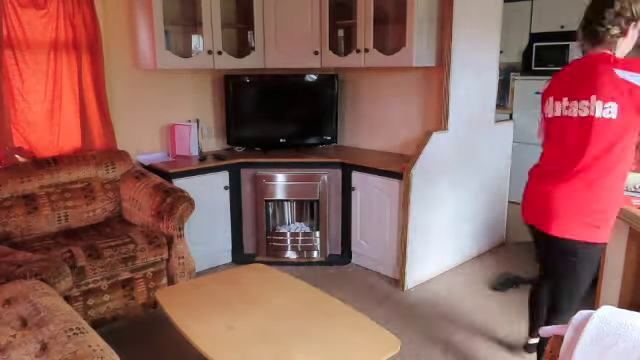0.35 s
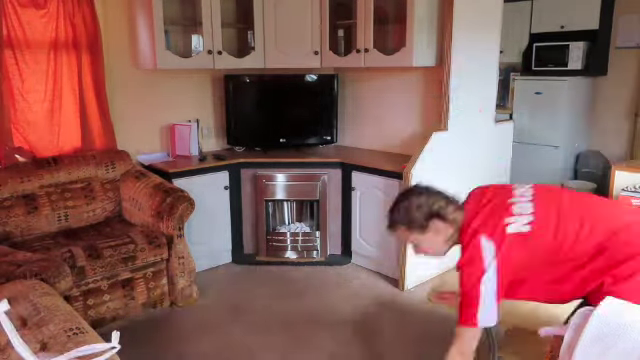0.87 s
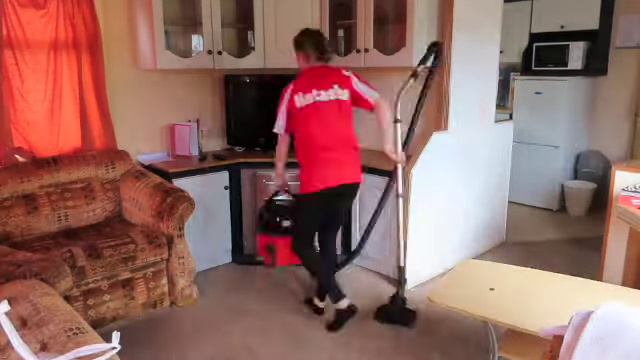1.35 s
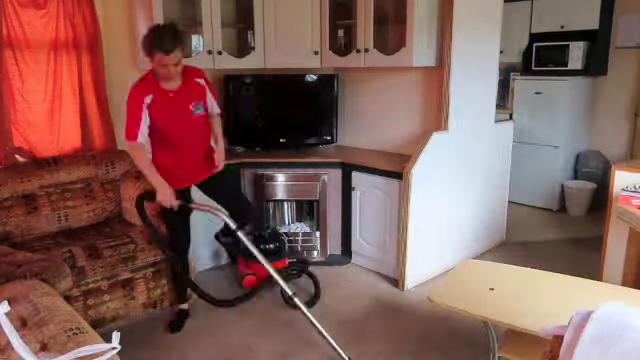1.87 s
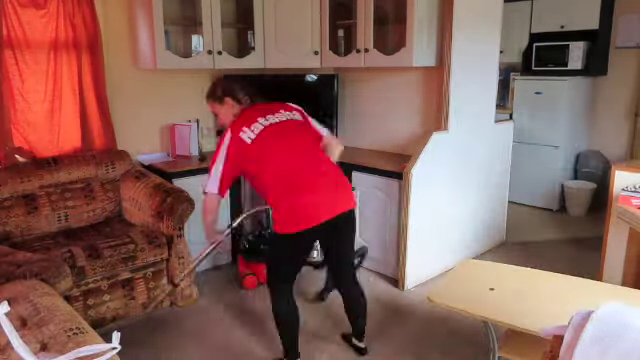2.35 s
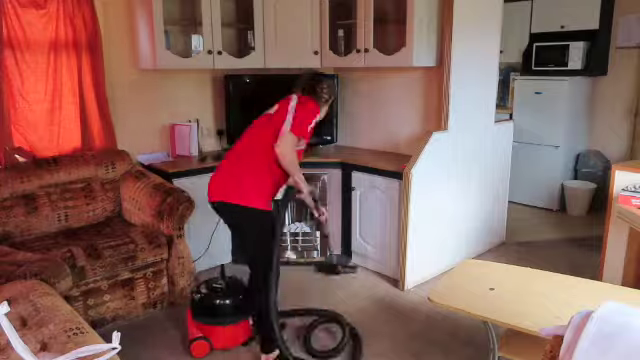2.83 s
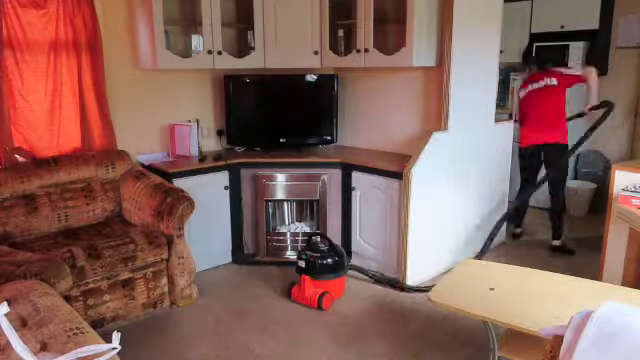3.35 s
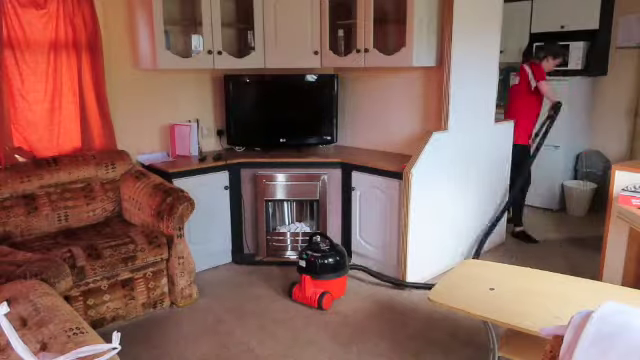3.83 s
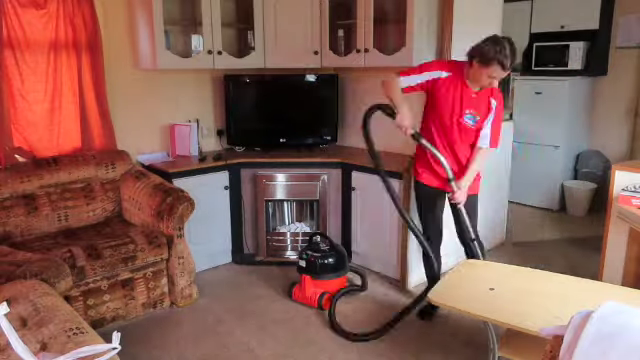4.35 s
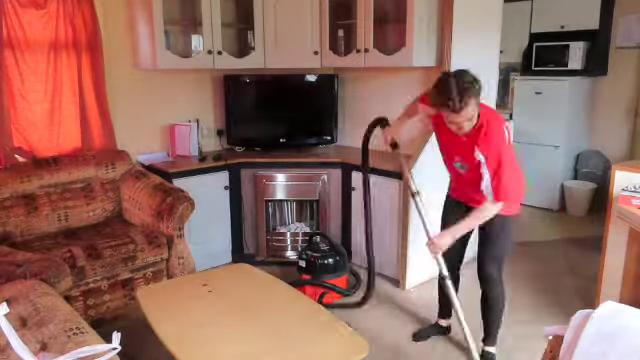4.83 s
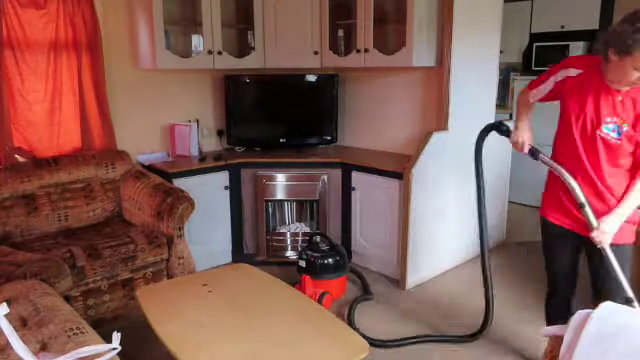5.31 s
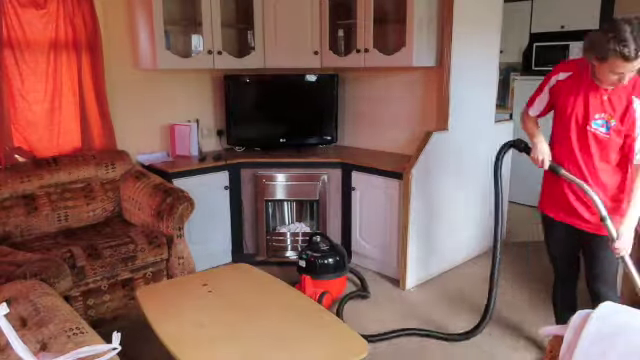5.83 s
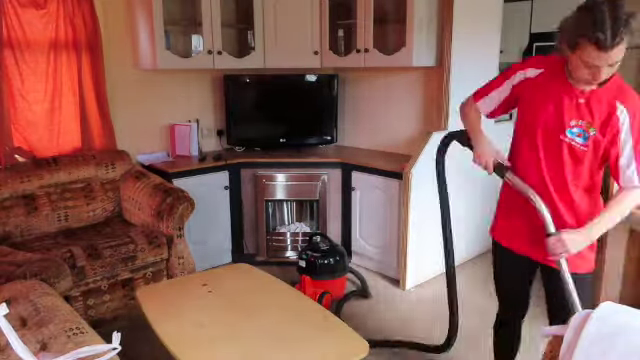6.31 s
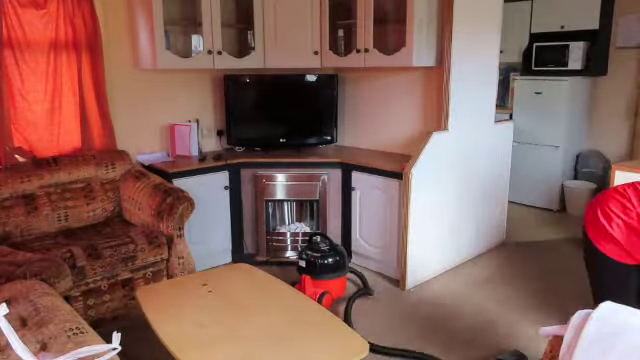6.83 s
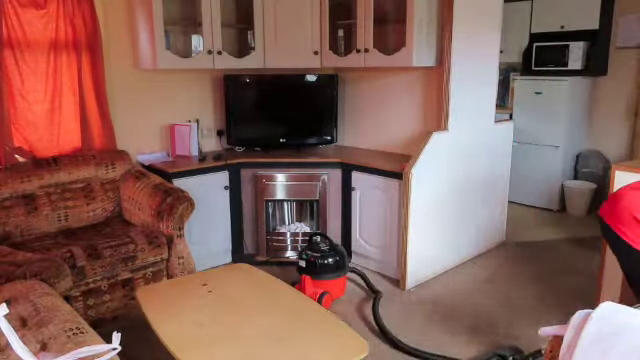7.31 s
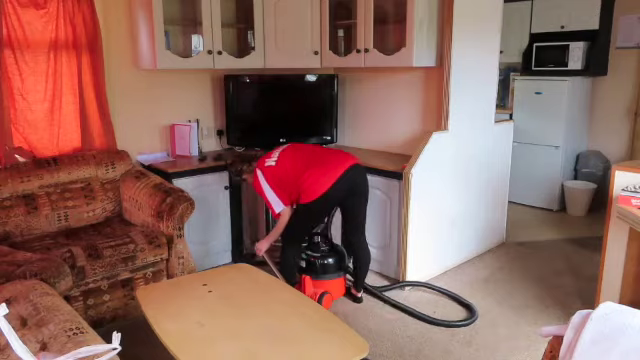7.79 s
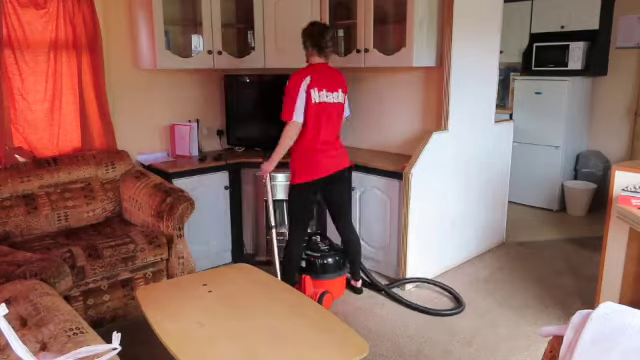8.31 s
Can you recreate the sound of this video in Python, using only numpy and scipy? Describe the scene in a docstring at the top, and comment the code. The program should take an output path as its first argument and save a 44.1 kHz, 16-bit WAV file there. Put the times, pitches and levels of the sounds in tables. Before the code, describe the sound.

Frantic taps and faint rustling give way to a fast-forwarded vacuum cleaner, airy hiss and piercing whine peppered with bumps and brush scrubs.

```python
"""A cylinder vacuum cleaner in a small carpeted room, sounding as if played about twenty times too fast. Its
mains hum is a thin sine, its shaft a high gliding whine; a flat hiss of shaped noise runs with it, its nozzle a
rumble of rough noise ringing the room. Before it is switched on there is faint shuffling; throughout, steps,
bumps and brush strokes are short knocks and scrubs: noise bursts that excite decaying room modes, with puffs of
hiss, small chance taps and a few floor thuds."""
import sys
import numpy as np
from scipy import signal
from scipy.fft import rfft, irfft, next_fast_len
from scipy.io import wavfile
from scipy.ndimage import uniform_filter1d

SR = 44100
rng = np.random.default_rng(int(sys.argv[2]) if len(sys.argv) > 2 else 0)


def decibels_to_gain(level_db):
    """Convert a level in decibels to a linear amplitude gain (20 dB per decade)."""
    exponent = np.asarray(level_db, float) / 20
    return 10 ** exponent


def materialize(psi):
    """Save the field psi as 16-bit PCM at rate SR to the path in sys.argv[1].

    A 1-D psi becomes a single channel; in a 2-D psi each row is a channel.
    """
    bounded = np.clip(np.atleast_2d(psi).T, -1, 1)
    quanta = np.round(bounded * 32767).astype(np.int16)
    wavfile.write(sys.argv[1], SR, quanta)


N = 382347

# resonances of room and furniture, excited by blows, strokes and nozzle: frequency_hz, level_db, t60_s
ROOM_MODES = [(1000, -17, 0.035), (1293, -3, 0.053), (1412, 9.5, 0.021), (1580, -2, 0.039),
              (1800, 5, 0.019), (2064, 8.5, 0.014), (2400, 8, 0.016), (2800, 3.5, 0.013),
              (3246, 7.5, 0.015), (3746, 7, 0.0094), (4170, 15, 0.0067), (5230, 12, 0.023)]
# spectrum of the hiss in knocks and taps: frequency_hz, level_db (per hertz)
PUFF_SPECTRUM = [(20, -16), (300, -6.5), (1000, 1.5), (9000, 0.5), (16000, -4.5)]


def evened(x):
    """Normalisation of mean power: scales to rms 1."""
    return x / np.sqrt(np.mean(x ** 2) + 1e-20)


def coloured(x, points):
    """Linear filtering: multiplies the spectrum by a curve through (Hz, dB) points."""
    f, db = np.transpose(points)
    size = next_fast_len(len(x))
    hz = np.fft.rfftfreq(size, 1 / SR)
    gain = decibels_to_gain(np.interp(np.log(hz + 1), np.log(f + 1), db))
    return irfft(rfft(x, size) * gain, size)[:len(x)]


def curve(rows):
    """Linear interpolation in time: sample positions, and every further column sample by sample."""
    s, *columns = np.transpose(rows)
    at = np.arange(round(s[0] * SR), min(round(s[-1] * SR), N))
    return at, [np.interp(at / SR, s, c) for c in columns]


def wander(count, ms):
    """Low-pass random process: noise smoothed twice over ms, with rms 1."""
    size = max(int(ms * SR / 1000), 1)
    smooth = uniform_filter1d(uniform_filter1d(rng.standard_normal(count), size), size)
    return evened(smooth)


def room_tone():
    """Broadband noise of fluctuating level: faint shuffling in the quiet room."""
    levels = [(0.0, -42), (0.072, -53), (1.088, -50), (1.318, -45), (1.572, -51.5), (1.76, -52.5)]  # time_s, level_db
    spectrum = [(18, -43), (30, -9), (70, -12), (200, -30), (372, 1), (1060, 0.5), (1340, -2), (3540, -7),
                (7780, -13), (15800, -14.5)]  # frequency_hz, level_db (per hertz)
    at, (db,) = curve(levels)
    noise = evened(coloured(rng.standard_normal(len(at)), spectrum))
    out = np.zeros(N)
    out[at] = decibels_to_gain(db + 3.5 * wander(len(at), ms=15)) * noise
    return out


def fidget():
    """Poisson process of small chance taps of hose, cable and clothes: decaying puffs of hiss."""
    start_s, fall_ms = 1.76, 2.5  # the motor starts; a tap falls by 10 dB
    quiet = np.arange(N) < start_s * SR
    taps_per_s = np.where(quiet, 40, 30)
    faintest_db = np.where(quiet, -54, -36)
    spread_db = np.where(quiet, 4, 3.5)
    tap_db = faintest_db + spread_db * np.minimum(rng.exponential(1, N), 3)
    taps = (rng.random(N) < taps_per_s / SR) * decibels_to_gain(tap_db)
    t_ms = np.arange(800) * 1000 / SR
    envelope = signal.oaconvolve(taps, decibels_to_gain(-10 * t_ms / fall_ms))[:N]
    return envelope * evened(coloured(rng.standard_normal(N), PUFF_SPECTRUM))


def ringing(modes, uneven_db=0, detune=0):
    """Modal superposition: decaying sines of total energy 1, levels and pitches varied by chance."""
    t = np.arange(2000) / SR
    hz, db, t60 = np.transpose(modes)[:, :, None]
    db = db + uneven_db * rng.standard_normal(db.shape)
    hz = hz * (1 + detune * rng.standard_normal(db.shape))
    decay = np.exp(-np.log(1000) * t / t60)
    ring = (decibels_to_gain(db) * decay * np.sin(2 * np.pi * hz * t)).sum(0)
    return ring / np.linalg.norm(ring)


def knocks(rows, size, width, skirt_db, ring_db, rounding, cut, grain_db):
    """Source and resonator: noise bursts around a body pitch excite the room modes; hiss puffs join.

    Rows: time_s, body_db, rise_ms, fall_ms, body_hz, hiss_db; rise and fall span 10 dB.
    """
    hiss_lead = .3  # share of the time-reversed envelope, so the hiss swells in early
    half = size // 2
    ms = (np.arange(size) - half) * 1000 / SR
    hz = np.fft.rfftfreq(size, 1 / SR)
    noise = rng.standard_normal((len(rows), 2, size))
    out = np.zeros(N + size)
    for (s, body_db, rise_ms, fall_ms, body_hz, hiss_db), (shake, puff) in zip(rows, noise):
        distance = abs(ms) / np.where(ms < 0, rise_ms, fall_ms)
        shape = decibels_to_gain(-10 * distance ** rounding + grain_db * wander(size, ms=1.5))
        puff_shape = np.maximum(shape, hiss_lead * shape[::-1])

        octaves = np.log2((hz + 1) / body_hz)
        peak_octaves = width * max(body_hz, 1500) / 2000
        skirt = decibels_to_gain(skirt_db - 6.1 * abs(octaves))
        peak = np.exp(-.5 * (octaves / peak_octaves) ** 2) + skirt
        low_cut = 1 / (1 + (cut * min(body_hz, 1900) / (hz + 1)) ** 8)
        # each knock favours and shifts some modes by chance
        room = 1 + decibels_to_gain(ring_db) * rfft(ringing(ROOM_MODES, uneven_db=4.5, detune=.04), size)

        burst = irfft(rfft(shake) * peak) * shape
        body = evened(irfft(rfft(burst) * low_cut * room))
        hiss = evened(coloured(puff, PUFF_SPECTRUM) * puff_shape)
        energy = np.sqrt(np.mean(shape ** 2))  # restores the envelope's rms after evening
        start = round(s * SR)
        out[start:start + size] += energy * (decibels_to_gain(body_db) * body + decibels_to_gain(hiss_db) * hiss)
    return out[half:half + N]


def blows():
    """Impulsive excitation: steps, bumps and taps with a sharp rise and a short fall."""
    # time_s, body_db, fall_ms (to -10 dB), body_hz, hiss_db
    events = [(0.014, -45, 4, 2500, -28), (0.0311, -24.0, 2.0, 1220.0, -58.0),
              (0.049, -34.0, 1.5, 2430.0, -45.0), (0.0596, -17.0, 3.2, 1150.0, -57.0),
              (0.094, -27.0, 2.4, 1710.0, -43.0), (0.1653, -25.0, 2.4, 1280.0, -58.0),
              (0.2042, -31.0, 2.4, 910.0, -53.0), (0.232, -15, 3, 4300, -16),
              (0.2905, -29.0, 2.0, 1080.0, -54.0), (0.348, -43.0, 2, 2090.0, -32.0),
              (0.382, -48.0, 2, 1960.0, -33.0), (0.4502, -24.0, 3.2, 1890.0, -23.0),
              (0.6008, -34.0, 3.2, 1710.0, -46.0), (0.6283, -34.0, 4.8, 900.0, -41.0),
              (0.6482, -31.0, 5.2, 1770.0, -43.0), (0.6821, -19.0, 4.0, 2160.0, -19.0),
              (0.7314, -30.0, 1.6, 1480.0, -58.0), (0.7739, -31.0, 1.6, 2230.0, -29.0),
              (0.787, -37.0, 2, 1900.0, -34.0), (0.8672, -35.0, 8.8, 2230.0, -48.0),
              (0.8955, -9, 2.4, 1750, -55), (1.0139, -40.0, 1.6, 2550.0, -27.0),
              (1.0289, -44.0, 2.0, 1940.0, -26.0), (1.0618, -22.0, 1.6, 990.0, -46.0),
              (1.0837, -13.0, 1.6, 1180.0, -58.0), (1.1067, -27.0, 1.6, 1210.0, -58.0),
              (1.168, -20.0, 2.0, 2430.0, -17.0), (1.188, -25.0, 2.0, 2510.0, -24.0),
              (1.2025, -23.0, 1.6, 2530.0, -36.0), (1.2355, -30, 2, 1500, -27),
              (1.2424, -24.0, 7.2, 1730.0, -22.0), (1.2848, -28.0, 1.6, 1970.0, -21.0),
              (1.301, -42, 1.5, 2500, -33), (1.3147, -35.0, 6.0, 2740.0, -29.0),
              (1.33, -42, 1.5, 2500, -34), (1.343, -44, 2, 2500, -33), (1.3586, -12.0, 2.0, 1300.0, -41.0),
              (1.37, -40, 1.5, 3000, -28), (1.4204, -36.0, 0.8, 3240.0, -21.0),
              (1.426, -18.0, 6.4, 2050.0, -16.0), (1.4715, -16.0, 2.4, 2370.0, -17.0),
              (1.4778, -13.0, 1.2, 2350.0, -13.0), (1.5058, -9.0, 1.2, 2920.0, -14.0),
              (1.5931, -38.0, 1.2, 1870.0, -27.0), (1.614, -27.0, 1.6, 2360.0, -20.0),
              (1.634, -13.0, 1.2, 2270.0, -19.0), (1.6669, -33.0, 2.8, 1730.0, -58.0),
              (1.7537, -26.0, 1.2, 2500.0, -36.0), (1.7745, -22.0, 1.5, 3740.0, -34.0),
              (1.836, -12.0, 3.2, 1640.0, -13.0), (2.208, -13.0, 4.5, 1790.0, -14.0),
              (2.2482, -18.0, 1.2, 1550.0, -53.0), (2.2775, -25.0, 2.4, 2100.0, -17.0),
              (2.3045, -17.0, 6.0, 2890.0, -28.0), (2.4451, -22.0, 9.6, 2490.0, -32.0),
              (2.4552, -17.0, 0.8, 1740.0, -41.0), (2.5255, -19.0, 1.2, 1870.0, -15.0),
              (2.5514, -18.0, 0.8, 3080.0, -19.0), (2.5863, -9.0, 1.6, 2430.0, -23.0),
              (2.6048, -14.0, 2.0, 2120.0, -15.0), (2.6567, -16.0, 1.6, 2380.0, -15.0),
              (2.7105, -13.0, 3.2, 2570.0, -10.0), (2.8013, -23.0, 4.4, 1700.0, -15.0),
              (2.8125, -21.0, 2, 1970, -18.0), (2.8802, -18.0, 3.2, 2790.0, -20.0),
              (2.9824, -15.0, 2.4, 2250.0, -16.0), (3.0338, -9.0, 2.0, 1910.0, -12.0),
              (3.0496, -15.0, 3.2, 1720.0, -52.0), (3.2403, -21.0, 9.6, 1930.0, -17.0),
              (3.2728, -17.0, 2.4, 1830.0, -16.0), (3.4962, -17.0, 2.4, 2060.0, -27.0),
              (3.7307, -16.0, 2.4, 2460.0, -17.0), (3.7497, -23.0, 2.4, 2740.0, -26.0),
              (3.8305, -14.0, 2.0, 2880.0, -17.0), (3.9442, -30.0, 6, 1940.0, -30.0),
              (4.0136, -12.0, 2.8, 2100.0, -16.0), (4.0849, -13.0, 4.0, 2370.0, -20.0),
              (4.1812, -23.0, 1.2, 2640.0, -16.0), (4.4127, -17.0, 5, 1970.0, -30.0),
              (4.7418, -16.0, 1.2, 1260.0, -27.0), (4.8512, -16.0, 2.8, 2210.0, -23.0),
              (5.0672, -17.0, 4.8, 1760.0, -21.0), (5.0831, -13.0, 1.2, 1670.0, -25.0),
              (5.161, -9, 3, 1650, -14), (5.1774, -9.0, 4.8, 1600.0, -23.0),
              (5.2163, -12.0, 2.8, 2040.0, -23.0), (5.2313, -16.0, 3.6, 1510.0, -24.0),
              (5.2642, -15.0, 2.4, 2380.0, -15.0), (5.3007, -10.0, 1.2, 1570.0, -24.0),
              (5.3146, -11.0, 6.0, 1830.0, -18.0), (5.372, -10.0, 1.2, 1520.0, -15.0),
              (5.3785, -17.0, 1.2, 1570.0, -38.0), (5.4568, -14.0, 3.6, 1660.0, -24.0),
              (5.4728, -11.0, 5.6, 1780.0, -26.0), (5.5361, -9.0, 3.2, 1530.0, -22.0),
              (5.753, -8, 2, 1620, -19), (5.9417, -12.0, 2.4, 1870.0, -18.0),
              (6.0879, -16.0, 3.2, 1710.0, -23.0), (6.2774, -11.0, 1.6, 1590.0, -16.0),
              (6.391, -23.0, 3, 1480.0, -32.0), (6.4929, -16.0, 4.0, 2180.0, -17.0),
              (6.7555, -24.0, 1, 2520.0, -24.0), (6.8516, -14.0, 1.6, 1700.0, -29.0),
              (6.8965, -21.0, 2, 1870.0, -42.0), (6.9118, -18.0, 1, 1610.0, -35.0),
              (6.927, -19.0, 1, 1690.0, -28.0), (6.9387, -15.0, 1, 2630.0, -18.0),
              (6.9464, -12.0, 2.0, 1880.0, -19.0), (6.9599, -16.0, 6.0, 1970.0, -23.0),
              (7.0397, -16.0, 2.8, 2750.0, -17.0), (7.0631, -22.0, 2, 2560.0, -18.0),
              (7.2345, -10, 1.5, 2800, -26), (7.2582, -19.0, 1.2, 3180.0, -12.0),
              (7.4867, -17.0, 3, 1860.0, -35.0), (7.5251, -24.0, 8.8, 2140.0, -13.0),
              (7.6648, -19, 4.4, 2600, -15), (7.826, -23, 1, 3000, -26),
              (7.8469, -22.0, 1.6, 2720.0, -12.0), (7.901, -23, 1.5, 3190, -25), (7.914, -24, 3, 3100, -26),
              (8.0868, -30.0, 6, 2510.0, -25.0), (8.1921, -25.0, 6.8, 2420.0, -18.0),
              (8.2205, -24.0, 8, 2360.0, -20.0), (8.3163, -18.0, 1.2, 2710.0, -15.0),
              (8.3971, -30.0, 2.0, 2400.0, -23.0), (8.4216, -25.0, 3.6, 3080.0, -20.0)]
    rise_ms = .7
    rows = [(s, db, rise_ms, ms, hz, hiss_db) for s, db, ms, hz, hiss_db in events]
    return knocks(rows, size=4096, width=.5, skirt_db=-10, ring_db=3, rounding=1.05, cut=.68, grain_db=1.1)


def thuds():
    """Forced modal vibration: partly rough pushes of differing length set two floor modes ringing."""
    # footfalls and dragged furniture: time_s, peak_db, drive_ms
    pushes = [(.031, -41, 1.2), (.058, -38, 1.1), (.168, -43, 3.1), (.204, -39, 1.9), (.264, -43, 2.2),
              (.292, -40, 3), (.486, -36, 2.6), (.628, -36, 1.6), (.78, -41, 50), (.82, -37, 14),
              (.894, -35, 1.4), (1.059, -42, 1.4), (1.083, -45, 3.5), (1.106, -42, 2), (1.241, -45, 4.4),
              (1.357, -36.5, 6.8), (1.425, -39, 3.2), (1.635, -50, 1.1), (2.8, -41, 6.6), (3.242, -42, 4.9),
              (4.55, -30, 50), (4.612, -21, 30), (7.408, -29, 30), (7.486, -32, 3.1)]
    floor_modes = [(389, 0, 0.048), (690, -2, 0.05)]  # frequency_hz, level_db, t60_s
    noise = rng.standard_normal((len(pushes), 2500))
    out = np.zeros(N)
    for (s, db, ms), rough in zip(pushes, noise):
        size = int(np.clip(ms, 1, 50) * SR / 1000)
        force = (1 + 2.5 * rough[:size]) * np.hanning(size)
        thud = np.diff(np.convolve(force, ringing(floor_modes)))
        out[round(s * SR):][:len(thud)] += decibels_to_gain(db) * thud / abs(thud).max()
    return out


def strokes():
    """Friction noise: brush strokes and drags as grainy flat-topped swells."""
    # centre_s, length_ms, body_db, body_hz, hiss_db
    events = [(0.324, 28.0, -41.0, 2070.0, -34.0), (0.537, 32.0, -45.0, 2240.0, -38.0),
              (0.697, 20, -50.0, 2220.0, -36.0), (0.8, 50, -39.0, 1950.0, -44.0),
              (0.82, 16, -28.0, 1440.0, -32.0), (0.875, 25, -41.0, 2500.0, -45.0),
              (1.15, 22, -37, 3040, -40), (1.545, 35.0, -40.0, 2640.0, -31.0),
              (1.771, 17.0, -30.0, 2440.0, -46.0), (1.968, 28.0, -20.0, 2250.0, -25.0),
              (2.044, 30.0, -22.0, 2380.0, -26.0), (2.131, 32.0, -23.0, 2350.0, -31.0),
              (2.235, 18, -26, 2700, -45), (2.381, 16, -20.0, 2970.0, -25.0),
              (2.419, 18.0, -26.0, 2950.0, -37.0), (2.633, 18, -28, 2800, -44),
              (2.911, 18.0, -27.0, 2320.0, -47.0), (3.078, 26.0, -23.0, 1760.0, -34.0),
              (3.141, 29.0, -31.0, 2090.0, -27.0), (3.178, 28, -16.0, 1950.0, -31.0),
              (3.312, 29.0, -25.0, 2200.0, -27.0), (3.415, 26, -28.0, 1910.0, -29.0),
              (4.278, 28.0, -31.0, 1970.0, -32.0), (4.575, 21.0, -26.0, 1780.0, -34.0),
              (4.632, 24.0, -23.0, 1740.0, -28.0), (4.701, 21.0, -22.0, 2040.0, -31.0),
              (4.76, 22.0, -19.0, 2270.0, -26.0), (4.827, 26.0, -18.0, 2160.0, -25.0),
              (4.856, 46.0, -27.0, 2210.0, -28.0), (4.895, 21.0, -22.0, 2110.0, -28.0),
              (5.114, 31.0, -28.0, 1690.0, -29.0), (5.245, 30, -27.0, 1530.0, -42.0),
              (5.4, 60, -29.0, 1580.0, -42.0), (5.637, 17.0, -25.0, 1840.0, -30.0),
              (5.669, 28, -26.0, 1650.0, -52.0), (5.788, 21.0, -30.0, 1560.0, -44.0),
              (6.03, 50, -33.0, 1520.0, -42.0), (6.125, 28, -35.0, 1470.0, -49.0),
              (6.177, 29.0, -35.0, 1730.0, -33.0), (6.305, 38.0, -32.0, 1880.0, -40.0),
              (6.562, 62.0, -37.0, 2180.0, -28.0), (6.682, 26.0, -10.0, 1780.0, -27.0),
              (6.751, 18.0, -31.0, 1840.0, -41.0), (6.815, 35, -30.0, 1450.0, -36.0),
              (7.496, 20, -30.0, 2660.0, -32.0), (7.594, 26.0, -31.0, 2680.0, -22.0),
              (7.769, 26.0, -28.0, 2240.0, -23.0), (7.99, 75, -34, 3000, -28),
              (8.482, 23.0, -33.0, 2470.0, -23.0)]
    up = .5  # share of the length spent swelling
    rows = [(s, db, up * ms, (1 - up) * ms, hz, hiss_db) for s, ms, db, hz, hiss_db in events]
    return knocks(rows, size=8192, width=.45, skirt_db=-9, ring_db=-1.5, rounding=2.4, cut=.7, grain_db=2.5)


def patchy(x, patch_db, frames, bins):
    """Time-varying filtering: the colour of a noise drifts in soft patches of time and pitch."""
    z = signal.stft(x, nperseg=256)[2]
    patches = uniform_filter1d(rng.standard_normal(z.shape), bins, axis=0)
    patches = evened(uniform_filter1d(patches, frames, axis=1))
    return signal.istft(z * decibels_to_gain(patch_db * patches), nperseg=256)[1][:len(x)]


def running_noise():
    """Broadband noise and friction: a flat hiss while the motor runs, rumble and rattles of the dragged nozzle."""
    # time_s, flat_db, floor_rumble_db
    running = [(1.76, -34.5, -37), (1.82, -31.5, -35), (1.94, -33.5, -37.5), (2.13, -32, -33.5),
               (2.84, -31, -36), (3.19, -31, -36), (3.51, -26.5, -39), (4.2, -30, -39), (4.73, -33, -38),
               (4.91, -34, -44), (5.04, -34, -48), (5.11, -30, -44), (5.4, -28.5, -42),
               (6.48, -30.5, -38.5), (6.94, -29.5, -39), (7.4, -31, -39), (7.73, -26.5, -47),
               (7.98, -25.5, -40.5), (8.67, -26.5, -43.5)]
    flat_spectrum = [(20, -5.5), (300, -6.5), (800, -8), (5000, -4), (9000, -4.5), (16000, -2.5)]  # frequency_hz, level_db (per hertz)
    rumble_spectrum = [(600, -13), (950, -4.5), (1300, -7.5), (1900, -1), (3200, 1.5), (4500, -10),
                       (8000, -45)]  # frequency_hz, level_db (per hertz)
    at, (flat_db, rumble_db) = curve(running)
    count = len(at)
    gusts = wander(count, ms=18.7)
    flat = coloured(rng.standard_normal(count), flat_spectrum)
    flat = evened(patchy(flat, patch_db=1.6, frames=24, bins=14))

    rattle_levels = decibels_to_gain(4.1 * np.minimum(rng.exponential(1, count), 3))
    rattles = (rng.random(count) < 150 / SR) * rattle_levels  # 150 a second on average
    bumpy = decibels_to_gain(3.8 * wander(count, ms=4.2)) + 1.2 * np.convolve(rattles, np.hanning(120), "same")
    drag = coloured(bumpy * rng.standard_normal(count), rumble_spectrum)
    room = signal.oaconvolve(drag, ringing(ROOM_MODES))[:count]
    rumble = evened(drag + 1.25 * room)

    out = np.zeros(N)
    out[at] = decibels_to_gain(flat_db + 1.5 * gusts) * flat + decibels_to_gain(rumble_db + 1.4 * gusts) * rumble
    return out


def tone(rows, waver_hz, flutter_db, drift_hz=0):
    """Frequency and amplitude modulation: a slightly unsteady sine on (s, Hz, dB) curves."""
    at, (hz, db) = curve(rows)
    count = len(at)
    unsteady_hz = hz + waver_hz * wander(count, ms=3.3) + drift_hz * wander(count, ms=40)
    turns = np.cumsum(unsteady_hz) / SR
    fade = np.minimum(1, np.minimum(at - at[0], at[-1] - at) / 200)
    level = decibels_to_gain(db + flutter_db * wander(count, ms=21)) * np.sqrt(2)  # dB of rms
    out = np.zeros(N)
    out[at] = level * fade * np.sin(2 * np.pi * turns)
    return out


def motor():
    """Periodic sources: mains hum, shaft whine at a pitch that follows the load, and gliding whistles."""
    hum_levels = [(1.765, -39), (1.95, -41), (3.2, -37.5), (4, -40), (4.6, -39.5), (6.6, -41.5),
                  (8.67, -43)]  # time_s, level_db
    # the shaft speeds up while the nozzle is sealed, settles when air flows: time_s, pitch_hz, level_db
    shaft_path = [(3.36, 9790, -40), (3.45, 10040, -40), (3.66, 10070, -39), (3.70, 9250, -42),
                  (3.80, 9050, -47), (3.875, 9700, -48), (3.935, 9200, -43), (4.25, 9130, -42),
                  (4.40, 9370, -47), (4.53, 9700, -43), (4.65, 9860, -42), (4.75, 9560, -49),
                  (4.88, 9450, -50), (4.95, 9630, -44), (5.015, 9650, -44), (5.07, 9150, -43),
                  (6.56, 9140, -44), (6.69, 9780, -47), (6.735, 9180, -47), (7.07, 9130, -45),
                  (7.13, 9500, -51), (7.2, 9180, -47), (7.35, 9260, -44), (7.45, 9070, -44),
                  (8.67, 9070, -45)]
    # one table for each gliding whistle: time_s, pitch_hz, level_db
    whistle_paths = [
        [(1.87, 11300, -43), (1.925, 9600, -41), (1.96, 9600, -42), (2.02, 9000, -45)],
        [(2.04, 10500, -45), (2.08, 9300, -41), (2.13, 10500, -45)],
        [(2.82, 11500, -41), (2.86, 10900, -39), (2.895, 12300, -41)],
        [(3.05, 11800, -44), (3.11, 9900, -40), (3.15, 10700, -39), (3.18, 10050, -40), (3.2, 10000, -40),
         (3.24, 9100, -42)],
        [(4.49, 10300, -48), (4.53, 8600, -43), (4.62, 7700, -42), (4.65, 7100, -41)],
        [(4.68, 8500, -45), (4.75, 10600, -44), (4.8, 9800, -45)],
    ]
    hum_hz = 1999
    hum = tone([(s, hum_hz, db) for s, db in hum_levels], waver_hz=2.2, flutter_db=0)
    shaft = tone(shaft_path, waver_hz=12, flutter_db=1.5, drift_hz=35)  # drift: small load changes
    whistles = sum(tone(rows, waver_hz=18, flutter_db=1) for rows in whistle_paths)
    return hum + shaft + whistles


def scene():
    """Mid-side superposition: almost mono, with a faint unrelated share and microphone hiss as side."""
    # side level relative to the loudness envelope: frequency_hz, level_db
    side_spectrum = [(60, -30.5), (550, -32.5), (1400, -38), (4970, -45.5), (15000, -43)]
    mid = room_tone() + fidget() + blows() + thuds() + strokes() + running_noise() + motor()
    # the constant keeps some hiss in the side when the mid is silent
    loudness = np.sqrt(uniform_filter1d(mid ** 2, 200) + 1e-12) + decibels_to_gain(-25)
    side = coloured(loudness * rng.standard_normal(N), side_spectrum)
    return np.array([mid + side, mid - side])


def top_cut(x):
    """Nothing passes above the cut-off."""
    return signal.sosfilt(signal.butter(12, 16990, fs=SR, output="sos"), x)


def record(dry):
    """Dynamic range compression: gain control ducks the sound after loud blows; peaks round off."""
    threshold_db, fall_db_per_s, delay = -22, 410.0, 300  # delay in samples
    power_db = 10 * np.log10(abs(uniform_filter1d((dry ** 2).mean(0), 200)) + 1e-12)
    fall = np.arange(N) * fall_db_per_s / SR
    held_db = np.maximum.accumulate(power_db + fall) - fall  # instant rise, steady fall
    over_db = np.maximum(held_db - threshold_db, 0)
    late_db = np.r_[np.zeros(delay), over_db[:-delay]]
    ducked = dry / decibels_to_gain(.5 * uniform_filter1d(late_db, 150))  # half the excess is taken away
    rounded = .75 * np.tanh(ducked / .75)
    edge = signal.firwin(1023, 15800, window=("kaiser", 9), fs=SR)  # low-pass at 15800 Hz
    mix = signal.oaconvolve(rounded, edge[None], "same")
    return top_cut(mix)


dry = scene()
out = record(dry)
materialize(out)
```